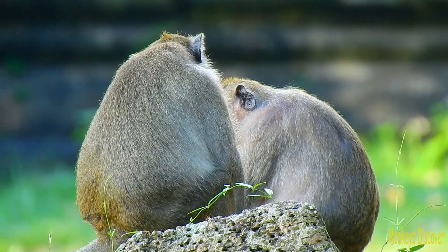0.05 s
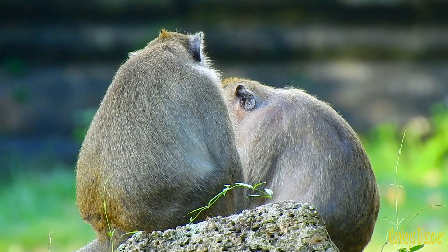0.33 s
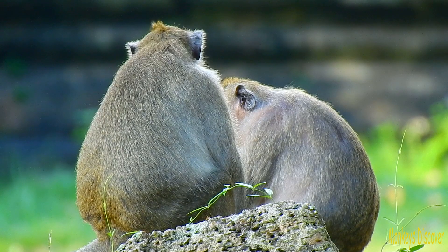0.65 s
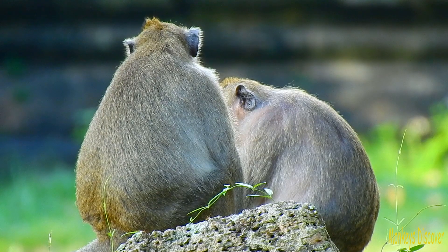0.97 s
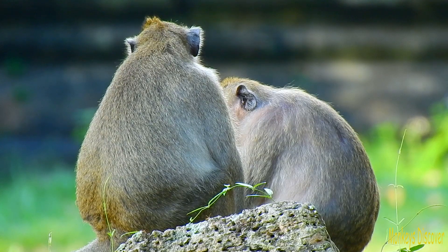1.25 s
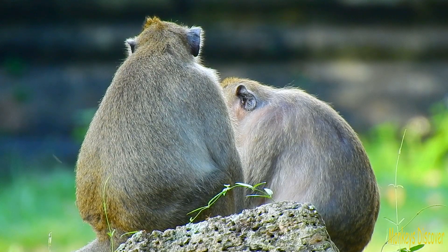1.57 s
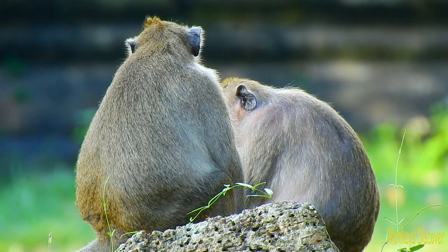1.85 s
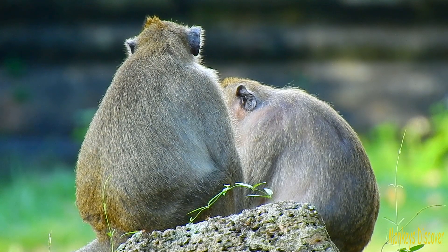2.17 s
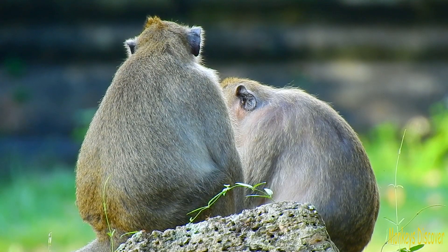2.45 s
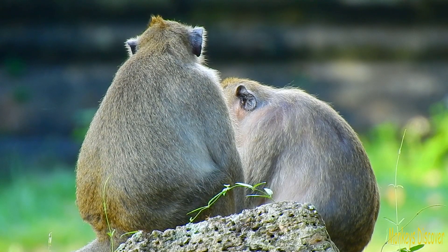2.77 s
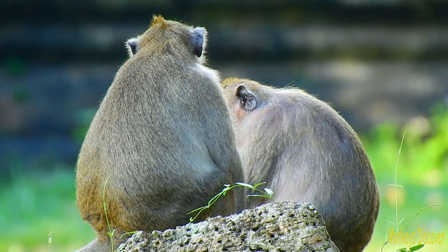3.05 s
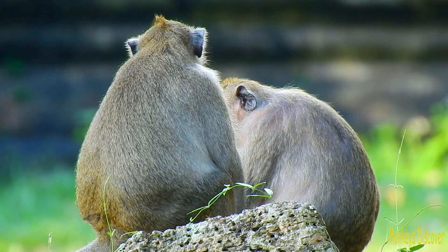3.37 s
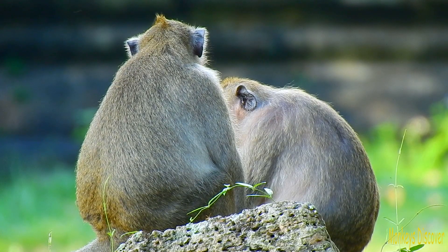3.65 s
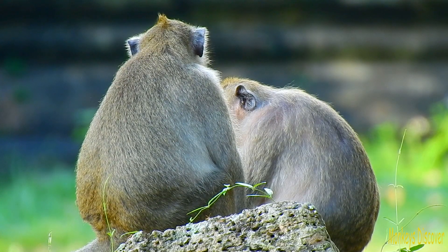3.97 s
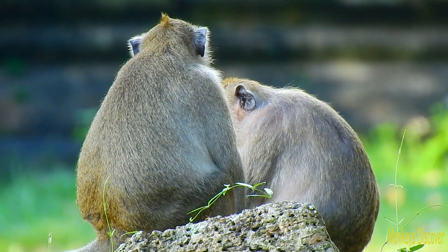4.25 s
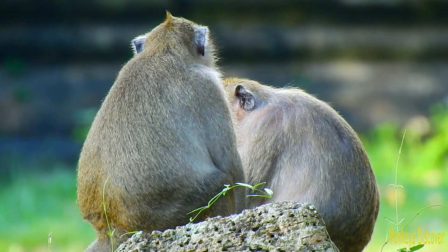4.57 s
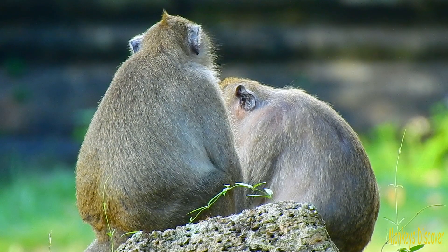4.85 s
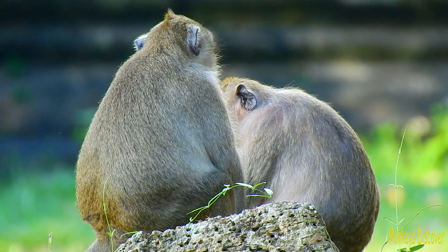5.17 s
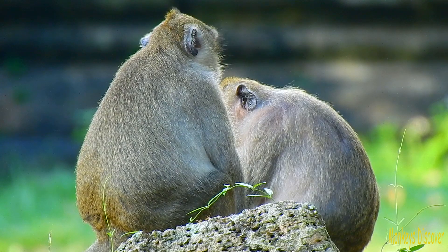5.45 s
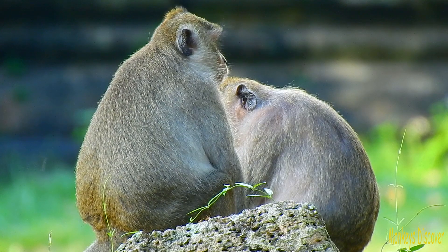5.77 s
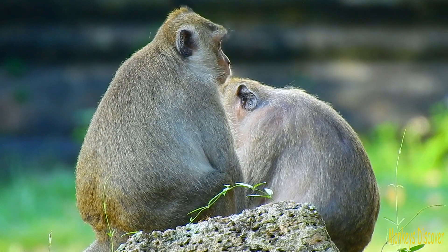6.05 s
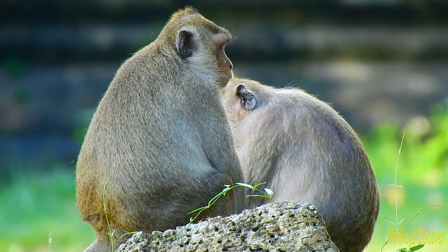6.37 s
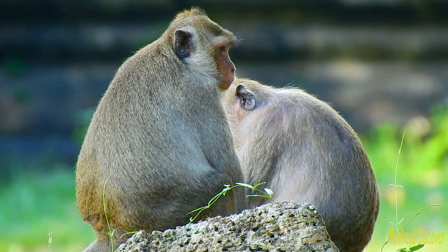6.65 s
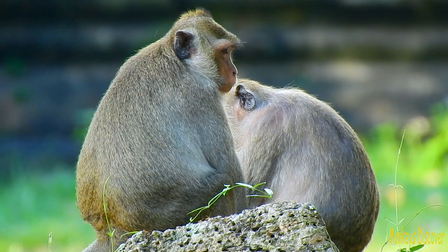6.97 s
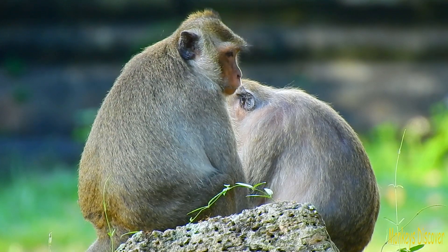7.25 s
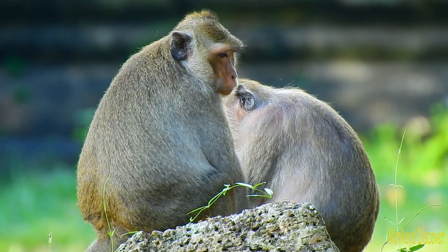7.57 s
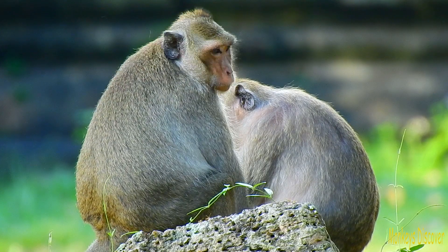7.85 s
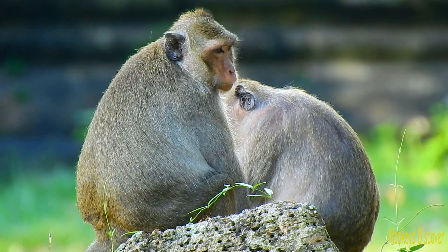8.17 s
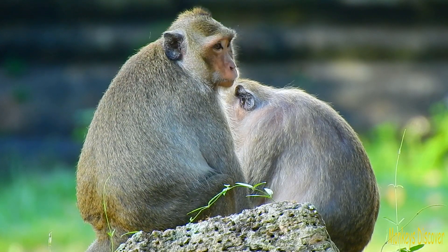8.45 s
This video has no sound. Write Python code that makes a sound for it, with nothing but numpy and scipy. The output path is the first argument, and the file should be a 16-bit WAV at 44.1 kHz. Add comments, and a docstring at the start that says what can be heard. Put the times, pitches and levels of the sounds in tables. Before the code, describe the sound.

Outdoors among trees, a bird repeats a short whistle that drops and levels off, five times, pauses, then gives ten more from another perch. Each note echoes. Smaller birds chirp far away over a steady traffic rumble and a soft hiss of leaves. Early on, something bumps and brushes the right side of the microphone, and a few small ticks sound. Near the end a distant engine pulls away.

```python
"""A whistling bird among trees

A bird repeats a short whistle that drops and levels off, five times, then ten times from a new perch. Trunks
and leaves echo each note. Smaller birds chirp far off over rumbling traffic and hissing leaves, and near the
end a distant engine grows louder as it takes up load. Early on, something bumps and brushes the right side of
the microphone, and a few small ticks sound."""
import sys
import numpy as np
from scipy import signal
from scipy.fft import rfft, irfft, next_fast_len
from scipy.io import wavfile
from scipy.ndimage import uniform_filter1d, map_coordinates

SR = 44100
rng = np.random.default_rng(int(sys.argv[2]) if len(sys.argv) > 2 else 0)


def dump(signal):
    """Clip the signal to [-1, 1] and save it as 16-bit WAV at the path in sys.argv[1]."""
    limited = np.clip(np.atleast_2d(signal).T, -1, 1)
    pcm = np.round(limited * 32767).astype(np.int16)
    wavfile.write(sys.argv[1], SR, pcm)


N = 375291

# tone colour of traffic and leaves (frequency [Hz], relative level [dB])
AIR_COLOUR = [(13, -58), (22, -14), (38, -11.5), (114, -1.5), (177, -10), (275, -17.5), (502, -19),
              (869, -18.5), (1180, -20), (1630, -21), (2090, -22), (2910, -26.5), (3720, -26.5),
              (5770, -26), (15500, -49)]
# how alike that noise is in both ears (frequency [Hz], likeness [0 to 1])
EAR_LIKENESS = [(60, 1), (180, 0.96), (550, 0.58), (1650, 0.081), (4970, 0), (15000, 0.021)]
# hum of idling machinery (pitch [Hz], level [dB])
IDLE_TONES = [(35.4, -57.5), (53.3, -53)]
# speed of the distant engine (time [s], cycle rate [Hz])
ENGINE_SPEED = [(6.27, 35.8), (6.61, 38.7), (7.14, 38.5), (7.25, 36.6), (7.57, 36.3), (8.1, 38.28),
                (8.51, 37.64)]
# its tones when it pulls (multiple of the cycle rate, relative level [dB])
ENGINE_TONES = [(2, -11), (3, -1.5), (5, -6.5), (6, -15)]
# how long the wood echoes; a "t60" is the time to fade by 60 dB (frequency [Hz], t60 [s])
WOOD_FADE = [(500, .9), (2150, 1.55), (2900, 1.57), (6000, 1.2), (9000, 0.9)]
# the clearest far birds (time [s], length [s], starting pitch [Hz], final pitch [Hz], level [dB])
CHIRPS = [(0, 0.087, 3900, 3750, -52), (0.933, 0.056, 7200, 6140, -52), (1.149, 0.14, 5200, 4340, -54.5),
          (1.609, 0.042, 7200, 5190, -44), (1.712, .033, 7710, 4880, -41), (1.807, 0.025, 7650, 5780, -42),
          (2.253, 0.18, 401, 337, -58.5), (2.598, .17, 6150, 3710, -52.5), (3.269, 0.087, 930, 861, -57.5),
          (3.696, 0.15, 5200, 3700, -58.5), (4.681, 0.21, 5370, 3930, -55), (4.813, 0.104, 405, 336, -58),
          (5.083, .12, 1033, 904, -55.5), (5.774, .14, 1876, 1524, -56), (6.856, 0.15, 1640, 1873, -59),
          (7.596, 0.062, 5400, 5580, -49.5), (7.766, .054, 920, 868, -55)]
# small ticks (time [s], peak level [dB], pitch [Hz], t60 [s], left over right [dB])
TICKS = [(.99, -28.5, 806, 0.029, -5), (1.223, -44, 8600, 0.15, -9), (1.956, -32.5, 3660, 0.013, 13.5),
         (2.2, -37.5, 3860, 0.019, 5), (2.737, -36, 3700, 0.0087, -2), (2.966, -34.5, 1610, 0.043, -4),
         (4.256, -45, 7500, .02, 0)]
# soft bumps on the microphone (time [s], strength [dB])
BUMPS = [(0.0948, -7.5), (.112, -8), (.137, -16), (0.178, -17), (.21, -20), (.607, -18), (0.898, -18),
         (1.114, -15), (1.333, -21.5), (1.362, -16.5), (1.381, -15), (1.415, -14.5), (1.536, -18)]
# brushing strokes on the microphone (time [s], length [s], level [dB])
STROKES = [(0.136, 0.0024, -24.5), (0.195, .003, -34), (1.376, 0.1, -31.5), (1.54, 0.0069, -25)]
# tone colour of the brushing (frequency [Hz], relative level [dB])
RUB_COLOUR = [(40, -9), (120, 9), (350, 1), (800, -3.5), (1600, -14.5), (5000, -18), (9000, -26),
              (15000, -34)]
# overtones of the whistle at full breath (multiple of the pitch, relative level [dB])
OVERTONES = [(2, -34.5), (3, -36.5), (4, -32.5), (5, -43)]
# strong echoes from clumps of trees, for each perch (delay [s], relative level [dB])
FIRST_ECHOES = [(.045, -19.5), (.075, -15)]
SECOND_ECHOES = [(.028, -12.5), (.06, -17.5)]
# whistles, the first only a lingering echo (time [s], level [dB], starting pitch [Hz], held pitch [Hz])
WHISTLES = [(-.33, -24.5, 3020, 2142), (.103, -22.5, 2930, 2146), (.562, -23, 3025, 2143),
            (.998, -22.5, 3086, 2141), (1.427, -23.5, 3128, 2134), (1.849, -23, 3186, 2151),
            (4.123, -27, 3165, 2157), (4.615, -26, 3216, 2162), (5.015, -26, 3127, 2177),
            (5.444, -25.5, 3093, 2153), (5.881, -27, 3136, 2184), (6.346, -26, 3198, 2182),
            (6.789, -25.5, 3218, 2187), (7.224, -26, 3120, 2165), (7.659, -25.5, 3270, 2168),
            (8.130, -26, 3297, 2173)]


def amp(db):
    """Turn decibels into a gain to multiply by."""
    return 10 ** (np.asarray(db) / 20)


def unit(x):
    """Scale a signal to an average strength (rms) of 1."""
    return x / np.sqrt(np.mean(x ** 2) + 1e-20)


def along(points, hz):
    """Look up hz in a (frequency, value) table, on a log frequency scale."""
    f, v = np.transpose(points)
    return np.interp(np.log(hz + 1), np.log(f + 1), v)


def wobble(rate, size=N):
    """A smooth curve through rate random values a second."""
    return map_coordinates(rng.standard_normal(int(size * rate / SR) + 4), [np.arange(size) * rate / SR])


def fade_in(s, swell_s):
    """A gain that rises smoothly from 0 to 1 around time s."""
    return (1 + np.tanh((np.arange(N) / SR - s) / swell_s)) / 2


def filtered(x, response):
    """Scale each frequency f in x by response(f)."""
    size = x.shape[-1]
    padded = next_fast_len(size + 8192)
    return irfft(rfft(x, padded) * response(np.fft.rfftfreq(padded, 1 / SR)), padded)[..., :size]


def pan(db):
    """Left and right gains, with the left louder by db."""
    return amp([[db / 2], [-db / 2]])


def add(track, s, sound):
    """Mix a sound into a stereo track at time s, which may be before the start."""
    start = round(s * SR)
    heard = sound[..., max(-start, 0):N - start]
    track[:, max(start, 0):max(start, 0) + heard.shape[-1]] += heard


def traffic_and_leaves(traffic_db=-48.5, leaves_db=-55.5, drift_db=0.94):
    """Traffic rumbles much alike in both ears, under a wide, slightly patchy hiss of leaves."""
    swell_db = 1.13 / (1 + (np.arange(N) / SR - 2.6) ** 2)  # one gentle rise, around 2.6 s
    traffic_gain = amp(traffic_db + swell_db - drift_db * wobble(1))
    leaves_gain = amp(leaves_db - drift_db * wobble(0.73))
    spectrum = signal.stft(rng.standard_normal((2, N)), nperseg=1024)[2]
    patches = uniform_filter1d(rng.standard_normal(spectrum.shape[1:]), size=8, axis=0)
    patches_db = unit(uniform_filter1d(patches, size=14, axis=1))
    noise = signal.istft(spectrum * amp(patches_db), nperseg=1024)[1][:, :N]
    # mid is what the ears share, side is how they differ
    spread = lambda f: np.arccos(np.clip(along(EAR_LIKENESS, f), 0, 1)) / 2
    mid, side = filtered(noise, lambda f: amp(along(AIR_COLOUR, f)) * [np.cos(spread(f)), np.sin(spread(f))])
    both = np.array([mid + side, mid - side])
    rumble = filtered(both, lambda f: 1 / (1 + (f / 450) ** 4))
    hiss = both - rumble
    level_in = lambda low, high: np.std(filtered(mid, lambda f: (f > low) & (f < high)))
    traffic = traffic_gain * rumble / level_in(60, 400)
    leaves = leaves_gain * hiss / level_in(500, 1700)
    return pan(-0.9) * (traffic + leaves)


def engines(drone_db=-53.5, pull_db=-42, throttle_s=0.032):
    """Machinery idles; a far engine starts to drone, then its low tones swell as it pulls."""
    t = np.arange(N) / SR
    rate_hz = np.interp(t, *np.transpose(ENGINE_SPEED)) * (1 + 0.0036 * wobble(10))
    phase = 2 * np.pi * np.cumsum(rate_hz) / SR
    tone = lambda k: np.sin(k * phase + rng.uniform(0, 2 * np.pi)) * amp(1.4 * wobble(8.3))
    pull = amp(pull_db) * fade_in(7.6, throttle_s) * sum(amp(db) * tone(k) for k, db in ENGINE_TONES)
    drone = amp(drone_db) * fade_in(6.28, throttle_s) * tone(4)
    idle = sum(amp(db + 1.2 * wobble(5)) * np.sin(2 * np.pi * hz * t + 1.6 * wobble(4.42))
               for hz, db in IDLE_TONES)
    return np.sqrt(2) * (pull + drone + idle) * pan(-0.59)


def wood_echo(early_db, early_t60, rise_s):
    """Echo pattern of the trees: near trunks answer densely, far ones linger."""
    hz, t, spectrum = signal.stft(rng.standard_normal((2, SR)), SR, nperseg=256)
    far = amp(-60 * t / along(WOOD_FADE, hz)[:, None])
    near = amp(early_db - 60 * t / early_t60)
    onset = 1 - np.exp(-t / rise_s)
    tail = signal.istft(spectrum * (far + near) * onset, SR, nperseg=256)[1][:, :SR]
    return unit(tail) / np.sqrt(SR)


def leaf_smear(t60=.11):
    """Leaves spread one echo over some tens of milliseconds."""
    t = np.arange(SR // 16) / SR
    smear = rng.standard_normal((2, len(t))) * amp(-60 * t / t60)
    return smear / np.linalg.norm(smear[0])


def scattered(sound, echo):
    """A sound heard through an echo pattern, with its energy kept in each ear."""
    heard = signal.fftconvolve(sound[None], echo, axes=1)
    return heard * np.linalg.norm(sound) / np.linalg.norm(heard, axis=1, keepdims=True)


def twitter(count=18, length_s=.05, low_hz=5180, high_hz=7300, end_ratio=.76, db=-61):
    """Faint falling chirps at random moments, as rows like those of CHIRPS."""
    when, height = rng.random((count, 2)).T
    times = (np.arange(count) + when) / count * (N / SR - length_s)
    pitches = low_hz + height * (high_hz - low_hz)
    return [(s, length_s, hz, hz * end_ratio, db) for s, hz in zip(times, pitches)]


def far_birds():
    """Short gliding chirps, half lost in their own echoes; the high ones are raspy."""
    calls = np.zeros((2, N))
    for s, length, from_hz, to_hz, db in CHIRPS + twitter():
        progress = np.linspace(0, 1, int(length * SR))
        glide = (1 - progress) ** (3.1 / (1 + from_hz / 4000))
        rasp = .3 * min(from_hz / 5000, 1) ** 3 * (1 - glide) * wobble(900, size=len(progress))
        hz = to_hz + (from_hz - to_hz) * (glide + rasp)
        breath = np.sqrt(np.abs(np.sin(np.pi * progress)))
        add(calls, s, amp(db) * unit(breath * np.sin(2 * np.pi * np.cumsum(hz) / SR)))
    # low calls carry straight through the leaves, high ones are mostly scattered
    straight = filtered(calls, lambda f: amp(-9) + .6 / (1 + (f / 2500) ** 4))
    return straight + scattered(calls[0], wood_echo(early_db=2, early_t60=.4, rise_s=.015))[:, :N]


def ticks(sharpness=2.7):
    """Dry little snaps: each is a burst of noise that rings broadly around one pitch."""
    out, t = np.zeros((2, N)), np.arange(SR // 10) / SR
    for s, db, hz, t60, side_db in TICKS:
        burst = rng.standard_normal((2, len(t))) * amp(-60 * t / t60)
        snap = filtered(burst, lambda f: (1j * f * hz / (sharpness * (hz**2 - f**2) + 1j * f * hz)) ** 2)
        add(out, s, amp(db) * pan(side_db) * snap / np.abs(snap).max())
    return out


def bumps(swing_hz=270, damping=3.0, scrape_t60=0.059):
    """Each bump scrapes the microphone and pushes its thin diaphragm in, which swings back once."""
    out, t = np.zeros((2, N)), np.arange(SR // 10) / SR
    cycles = swing_hz * t
    push = -np.sin(2 * np.pi * cycles) * np.exp(-damping * cycles - (cycles / 1.8) ** 2)
    hardest_db = max(db for _, db in BUMPS)
    soften = lambda f: 1 / np.hypot(1, f / 2500) / np.hypot(1, f / 9000)
    for s, db in BUMPS:
        scrape = unit(filtered(rng.standard_normal(len(t)), soften))
        scrape_db = -25 + 0.47 * (db - hardest_db)  # harder bumps scrape more
        add(out, s, amp(db) * (push + amp(scrape_db - 60 * t / scrape_t60) * scrape))
    return out


def brushing(grain_db=1.5, rise_db_per_s=800, fall_db_per_s=1500):
    """A grainy rub on the microphone: each stroke rises, holds and dies away."""
    t = np.arange(N) / SR
    grains = rng.standard_normal(N) * amp(grain_db * wobble(350))
    rub = unit(filtered(grains, lambda f: amp(along(RUB_COLOUR, f))))
    strength = np.zeros(N)
    for s, length, db in STROKES:
        before, after = np.maximum(s - t, 0), np.maximum(t - s - length, 0)
        strength += amp(db - rise_db_per_s * before - fall_db_per_s * after)
    return strength * rub


def whistle(top_hz, held_hz, fall_s, length_s=.07, attack_s=.003, droop_hz=105):
    """One note, as a pure tone and its overtones: the pitch falls, holds, and sags as the breath stops."""
    t = np.arange(int(length_s * SR)) / SR
    swell = amp(4 * np.minimum(t / .05 - 1, 0))  # grows by 4 dB over 0.05 s
    release = (1 + np.tanh((t - .0569) / .0024)) / 2
    breath = (1 - np.exp(-t / attack_s)) * swell * (1 - release)
    glide = np.exp(-(t / fall_s) ** 1.6)
    hz = held_hz + (top_hz - held_hz) * glide - droop_hz * release
    waver = (.002 + .01 * glide) * wobble(400, size=len(t))
    phase = 2 * np.pi * np.cumsum(hz * (1 + waver)) / SR
    tone = breath * np.sin(phase)
    overtones = breath ** 2 * (1 - glide) * sum(amp(db) * np.sin(k * phase) for k, db in OVERTONES)
    return np.array([tone, overtones]) / np.std(tone)


def bird(calls, clumps, fall_s, direct_db, shade_hz, echo_db, side_db, early_db, drift=0.88):
    """Whistles from one perch share an echo pattern that varies as the bird turns its head."""
    out, shimmer = np.zeros((2, N)), np.zeros((2, N))
    trees = lambda: wood_echo(early_db, early_t60=.33, rise_s=.005)
    perch = trees()
    for s, db, top_hz, held_hz in calls:
        tone, overtones = amp(db) * whistle(top_hz, held_hz, fall_s)
        # leaves muffle the high start of the note on the straight path
        straight = filtered(tone, lambda f: 1 / (1 + (f / shade_hz) ** 10))
        add(out, s, amp(direct_db) * pan(side_db) * straight)
        echo = (perch + drift * trees()) / np.hypot(1, drift)
        for delay, clump_db in clumps:
            add(echo, delay, amp(clump_db) * leaf_smear())
        add(out, s, amp(echo_db) * scattered(tone, echo))
        add(shimmer, s, overtones)
    # overtones are beamed off into the trees and come back only as a shimmer
    return out + scattered(shimmer[0], wood_echo(early_db=4, early_t60=.5, rise_s=.04))[:, :N]


def scene(move_s=3):
    """The bird whistles from one perch before move_s and from another after, in its surroundings."""
    first = bird([w for w in WHISTLES if w[0] < move_s], FIRST_ECHOES, fall_s=.017,
                 direct_db=-4.0, shade_hz=2320, echo_db=-2.6, side_db=-2.5, early_db=4)
    second = bird([w for w in WHISTLES if w[0] > move_s], SECOND_ECHOES, fall_s=.0142,
                  direct_db=-8.5, shade_hz=3080, echo_db=-0.2, side_db=3.0, early_db=0)
    birds = first + second + far_birds()
    touches = (bumps() + brushing()) * amp([[-24], [0]])  # almost all on the right
    return birds + touches + ticks() + engines() + traffic_and_leaves()


def record(dry):
    """The recorder drops the deepest rumble and the very highest treble."""
    low_hz, top_hz = 30, 15720
    return filtered(dry, lambda hz: (hz < top_hz) / np.hypot(1, (low_hz / (hz + 1)) ** 12))


dry = scene()
out = record(dry)
dump(out)
```